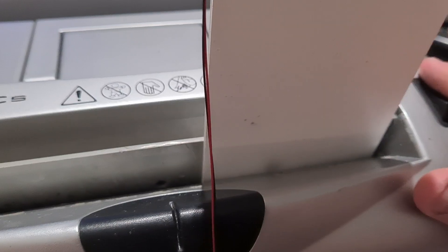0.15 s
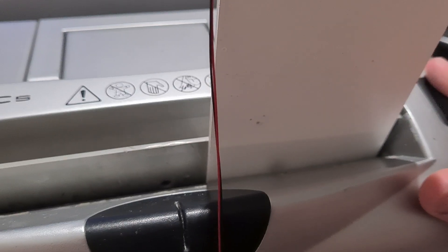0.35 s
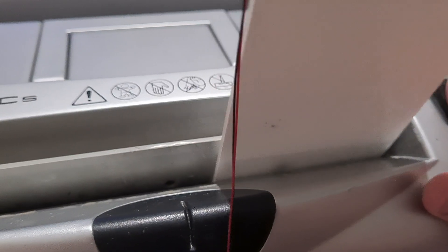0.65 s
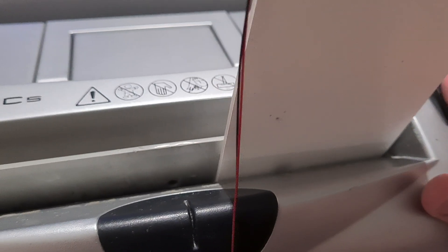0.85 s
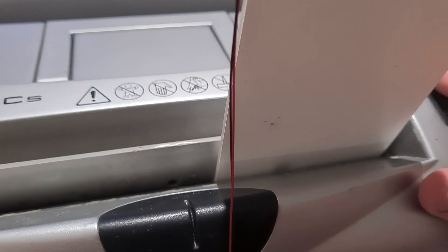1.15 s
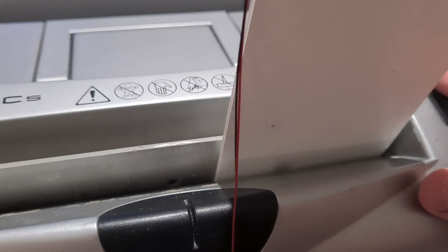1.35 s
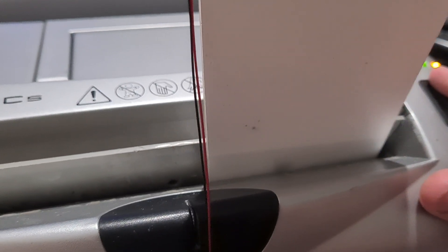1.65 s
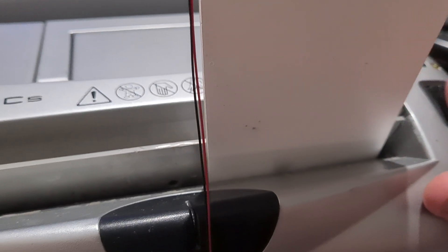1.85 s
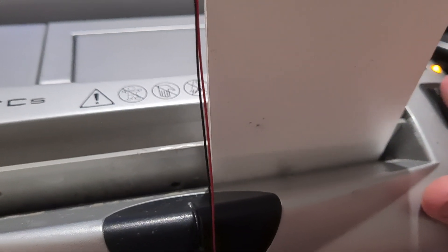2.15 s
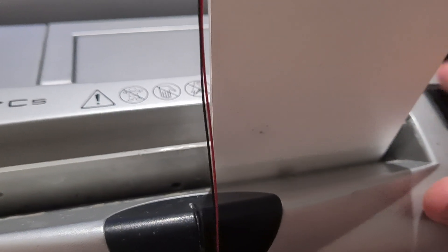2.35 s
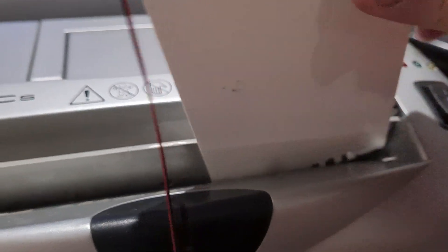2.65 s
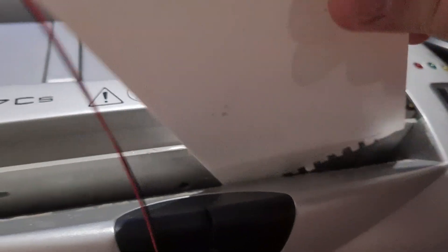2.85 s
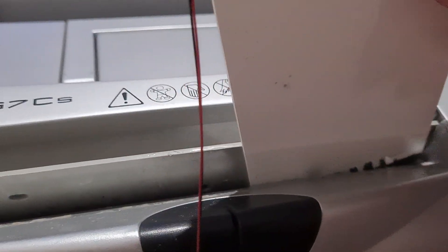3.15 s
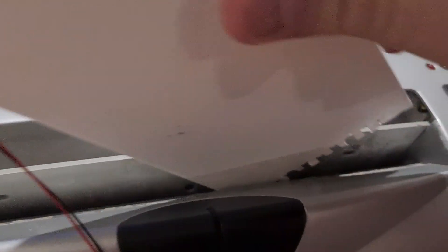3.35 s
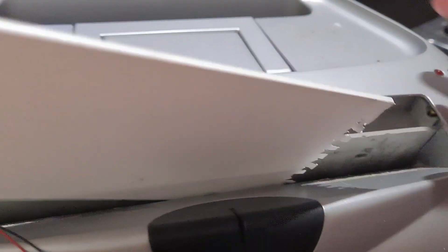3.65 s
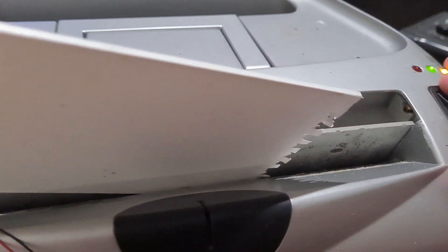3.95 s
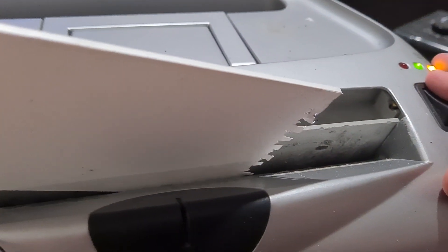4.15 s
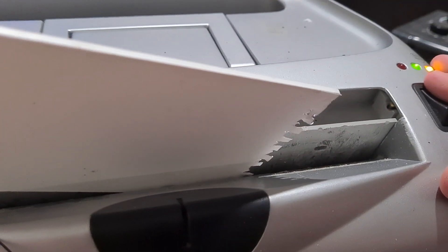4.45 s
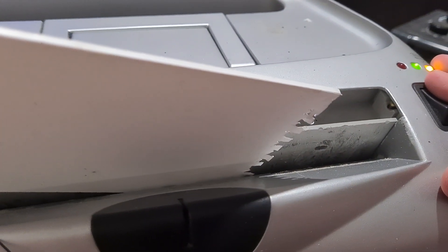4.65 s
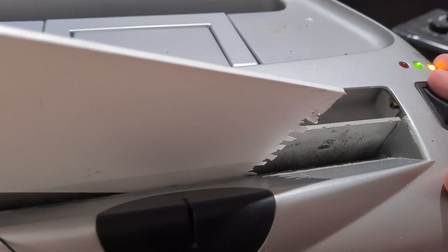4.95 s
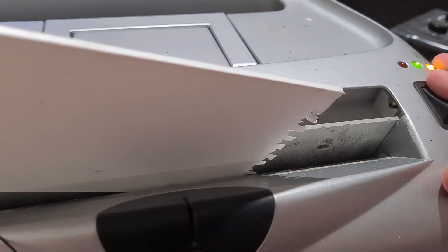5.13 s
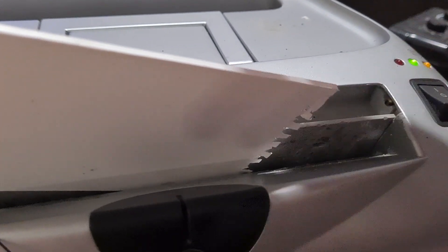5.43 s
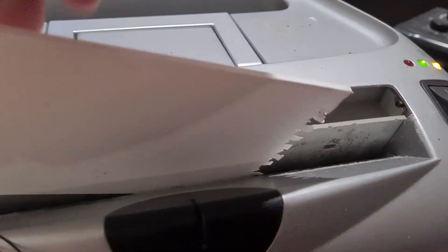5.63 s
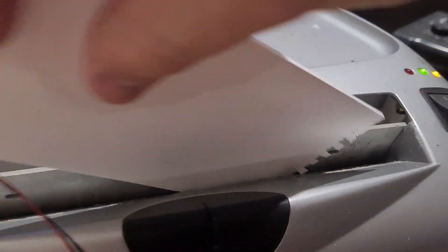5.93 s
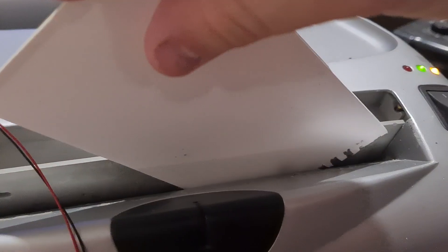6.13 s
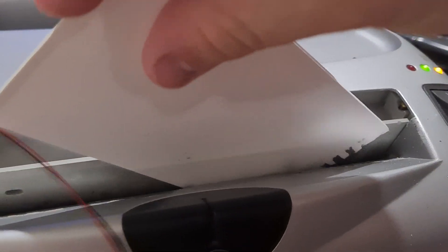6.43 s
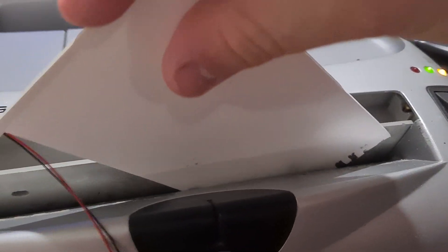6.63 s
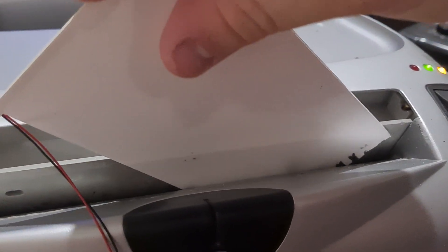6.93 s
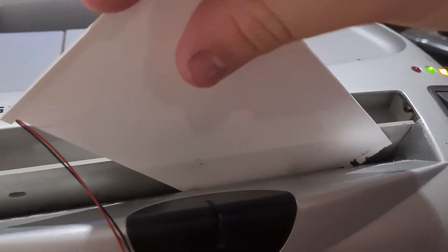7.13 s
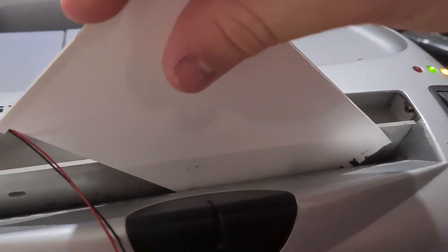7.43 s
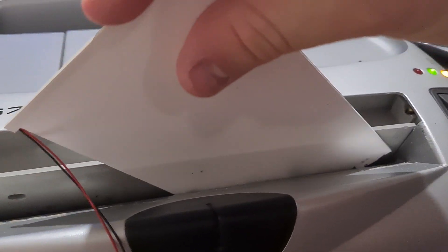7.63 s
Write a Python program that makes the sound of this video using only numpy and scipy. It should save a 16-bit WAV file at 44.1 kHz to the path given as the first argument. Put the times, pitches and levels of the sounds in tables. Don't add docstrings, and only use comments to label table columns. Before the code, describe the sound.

A small electric shredder hums in short spurts with sharp switch clicks, then bites stiff plastic with loud cracks, knocks and a crunching chatter.

```python
import sys
import numpy as np
from scipy import signal
from scipy.fft import rfft, irfft, next_fast_len
from scipy.io import wavfile
from scipy.ndimage import map_coordinates

SR = 44100
rng = np.random.default_rng(int(sys.argv[2]) if len(sys.argv) > 2 else 0)


def how_loud(loudness_db):
    steps = np.asarray(loudness_db, float) / 20
    return 10 ** steps


def output_pcm(signal):
    pcm = np.clip(np.atleast_2d(signal).T, -1, 1) * 32767
    wavfile.write(sys.argv[1], SR, np.round(pcm).astype(np.int16))


N = 343098

# on in seconds, off in seconds, gear whir level in dB.
SWITCH_RUNS = [
    (-.1, 0.18, -56.5),
    (0.519, 1.04, -52.5),
    (1.134, 1.45, -49),
    (1.947, 2.178, -51),
    (3.6, 3.596, -65),
    (3.982, 8, -46.5),
]
# start in seconds, peak in dB, panel level in dB relative to it, t60 in seconds.
BIN_JOLTS = [(0.037, -39.5, -11, 0.4), (0.437, -46.5, 2.5, 0.5), (1.313, -32, 1.5, 0.31),
             (1.449, -26.5, -6, 0.24), (1.499, -33, 0, 0.38), (1.632, -41.5, 0, 0.28),
             (1.868, -44, -2, 0.58), (2.58, -41.5, 4.5, 0.25), (2.64, -50.5, 2, 0.21),
             (2.979, -37.5, -1, 0.22), (3.9, -39.5, -22, 0.23), (4.207, -15, 1, 0.3),
             (4.246, -27.5, 5, 0.83), (4.364, -19, -2, 0.33), (4.746, -19, 3, 0.29),
             (4.888, -30, 11.5, 0.27), (6.347, -22, 0.5, 0.39), (6.481, -18, -27, 0.16),
             (6.599, -19, -19, 0.23), (6.709, -18, -7.5, 0.15), (6.772, -14.5, -5, 0.16),
             (6.9, -24, 2.5, 0.26), (6.969, -30.5, 11, 0.38), (7.279, -26.5, 4, 0.34),
             (7.419, -28.5, -4, 0.35), (7.648, -24, 0.5, 0.19), (7.708, -28.5, 8.5, 0.19)]
# start in seconds, peak in dB, knock and top in dB relative to it.
FIRST_MOUTHFUL = [(6.2863, -16.5, -15, -9), (6.2922, -16, -6.5, -5), (6.33, -12, -8.5, -3.5),
                  (6.3485, -20.5, 10, -11), (6.373, -13, -1.5, -3), (6.4438, -23, -7, 4.5),
                  (6.4516, -17.5, -9.5, 6), (6.497, -16, 2.5, -6), (6.547, -14, -26, -9),
                  (6.5757, -8, -15.5, -2), (6.6491, -15, -24, -7), (6.6602, -11.5, -17, -2.5),
                  (6.6786, -12, -12.5, -1), (6.6925, -20.5, -2.5, -13), (6.7059, -10.5, -8.5, -5.5),
                  (6.7578, -10, -1, 0), (6.8145, -9.5, -30, -2), (6.8235, -15, -22, -9),
                  (6.8441, -7, -7, -6), (6.8776, -7.5, -3, -6), (6.951, -7, -13, -5),
                  (6.9759, -17.5, -6, -12), (7.0074, -26, -11, 0), (7.0355, -20.5, -33, 2),
                  (7.0604, -11, -16, -4), (7.088, -28, -29, 3), (7.1173, -22.5, -6.5, -0.5),
                  (7.1934, -17.5, -18, -15)]


def unit(x):
    return x / np.sqrt(np.mean(x ** 2) + 1e-20)


def along(points, hz):
    f, value = np.transpose(points)
    return np.interp(np.log(hz + 1), np.log(f + 1), value)


def curves(rows):
    s, *columns = np.transpose(rows)
    return [np.interp(np.arange(N) / SR, s, column) for column in columns]


def wobble(rate):
    knots = rng.standard_normal(int(N * rate / SR) + 4)
    return map_coordinates(knots, [np.arange(N) * rate / SR])


def filtered(x, response):
    m = next_fast_len(N + SR // 2)
    return irfft(rfft(x, m) * response(np.fft.rfftfreq(m, 1 / SR)), m)[..., :N]


def band(x, lo_hz, hi_hz):
    return signal.lfilter(*signal.butter(2, [lo_hz, hi_hz], "band", fs=SR), x)


def hiss(spectrum):
    return unit(filtered(rng.standard_normal((2, N)), lambda hz: how_loud(along(spectrum, hz))))


def tone(hz, drift):
    return np.sqrt(2) * np.sin(2 * np.pi * np.cumsum(hz * (1 + drift * wobble(13))) / SR)


def powered(rise, fall):
    t = np.arange(N) / SR
    return [np.minimum(0, np.minimum(rise * (t - on), fall * (off - t))) for on, off, _ in SWITCH_RUNS]


def effort():
    # time in seconds, hum level in dB.
    pull = [(0.05, -30), (0.22, -46), (0.56, -26.5), (0.65, -39), (0.8, -25.5), (0.88, -42), (1.14, -29.5),
            (1.35, -30), (1.45, -28), (2.16, -31.5), (3.59, -27.5), (3.99, -24.5), (4.08, -28.5),
            (4.2, -27.5), (5.6, -23), (6.3, -24), (7.05, -31.5), (7.62, -33.5)]
    hum_rest_db, gear_rest_db = -66, -70
    strain_db, strain_s = -29, 0.036
    hum = how_loud(curves(pull)[0] + np.max(powered(570, 460), axis=0)) + how_loud(hum_rest_db)
    ramps = powered(300, 440)
    whir = sum(how_loud(db + ramp) for (_, _, db), ramp in zip(SWITCH_RUNS, ramps)) + how_loud(gear_rest_db)
    starts = [round(row[0] * SR) for row in BIN_JOLTS]
    jolts = np.bincount(starts, [how_loud(row[1] + strain_db) for row in BIN_JOLTS], N)
    ease = np.arange(SR // 2) / SR / strain_s
    strain = signal.fftconvolve(jolts, ease * np.exp(1 - ease))[:N]
    return hum, whir + np.abs(strain)


def motor():
    # frequency in Hz, width in Hz, level in dB.
    gear_modes = [(148, 49, 1), (203, 41, 1), (295.4, 13.6, 3.5), (378.4, 31.5, -4.5), (448.6, 11, -2),
                  (589, 40, -2), (820, 90, -8.5), (1160, 36, -5.5), (1349, 54, -4.5), (1960, 230, -12.5),
                  (3000, 440, -20.5)]
    # frequency in Hz, level in dB per Hz.
    whir_spectrum = [(60, -18), (130, -9.5), (230, -28), (640, -35.5), (1500, -65), (4000, -45.5),
                     (12000, -61), (17000, -85)]
    # multiple of the shaft rate, level in dB relative to the hum.
    shaft_orders = [(3, -39.5), (9, -19), (12, -24.5), (15, -24.5), (16, -26)]
    # time in seconds, level in dB.
    free_run = [
        (4.7, -18),
        (5.1, -2.5),
        (6.2, -1.5),
        (6.4, -19),
    ]
    hum_hz, shaft_hz = 100, 49
    hum_gain, whir_gain = effort()
    hum = how_loud(wobble(8)) * tone(hum_hz, 0)
    hum += how_loud(-24.5) * tone(2 * hum_hz, 0) + how_loud(-25.5) * tone(3 * hum_hz, 0)
    turns = np.cumsum(shaft_hz * (1 + .004 * wobble(6))) / SR
    orders = sum(how_loud(db + 3 * wobble(24)) * np.sin(2 * np.pi * k * turns) for k, db in shaft_orders)
    buzz = hum + how_loud(curves(free_run)[0]) * orders
    teeth = rng.standard_normal((2, N)) * how_loud(3.5 * wobble(160) + 1.6 * wobble(22))

    def resonate(f):
        return sum((-1) ** k * how_loud(db) * 1j * f * width / (centre * centre - f * f + 1j * f * width)
                   for k, (centre, width, db) in enumerate(gear_modes))

    broad = filtered(teeth[::-1], lambda hz: how_loud(along(whir_spectrum, hz)))
    whir = unit(filtered(teeth, resonate)) + how_loud(1.5) * unit(broad)
    return how_loud(7.0) * whir_gain * whir + hum_gain * np.array([buzz, np.roll(buzz, 90)])


def breaks():
    # start in seconds, peak in dB, knock and top in dB relative to it.
    second_mouthful = [(7.2615, -6, -18.5, -4), (7.2814, -8.5, -11, -3), (7.3379, -7.5, -26, -12.5),
                       (7.3437, -7.5, -18, -2), (7.3617, -19, -47, -2), (7.3733, -21.5, -3.5, 6.5),
                       (7.4026, -11.5, -7, -2.5), (7.5122, -10, -4, -8.5), (7.5689, -22, -13, 0),
                       (7.5853, -10, -15.5, -3), (7.613, -8, -20.5, -6), (7.645, -9.5, -5, 1),
                       (7.6905, -7, -9, -8), (7.737, -12.5, -11, -8.5)]
    # start in seconds, peak in dB, top in dB relative to it, ring in Hz.
    switch_clicks = [(0.2228, -49.5, 5, 7500), (0.4086, -21.5, -18, 5000), (0.4331, -17, -10, 5030),
                     (0.468, -8, -4.5, 6930), (0.633, -32.5, -12, 4320), (0.6623, -25.5, -18, 3100),
                     (0.7053, -26.5, -11.5, 3540), (1.032, -15, -9, 6120), (1.4015, -29, -11, 2550),
                     (1.8411, -18, -18, 5240), (1.8703, -15.5, -8.5, 5630), (2.1248, -30, -7, 4570),
                     (2.143, -15, -15, 4820), (2.8141, -31, -7, 3380), (2.957, -44.5, -30, 5630),
                     (3.177, -42, -1.5, 3030), (3.325, -37.5, -16, 4370), (3.362, -40, -9, 4450),
                     (3.88, -33, -44, 5830), (4.1953, -10.5, -27, 3350), (5.111, -23.5, -10, 5520),
                     (5.392, -34.5, -13, 5040), (5.7175, -28, -13, 7600), (5.9677, -19, -7.5, 4900),
                     (6.0728, -25, -3, 3520)]
    # start
    # in seconds, peak in dB, knock and clack in dB relative to it, ring in Hz.
    cutter_blows = [(0.0365, -37.5, 0.5, 2, 3240), (0.0783, -32.5, -17, -11, 6900),
                    (0.133, -34.5, -7.5, -9, 4230), (0.7348, -46.5, 14, 10.5, 2564),
                    (0.8704, -15, -31.5, -10.5, 5000), (1.271, -28, -3, -0.5, 3100),
                    (1.294, -24.5, 6, 3.5, 3180), (1.4203, -21, -22.5, 0, 4000),
                    (1.4356, -17, -6, -4, 4000), (1.4677, -26.5, -1, -17, 4380),
                    (1.489, -18, -9.5, -6.5, 5100), (1.6169, -14, -5.5, 2.5, 2800),
                    (3.8865, -10, -44, -12, 6200), (4.1727, -26, 4.5, 7, 3120),
                    (4.1967, -3.5, -12.5, -3, 3120), (4.2392, -7.5, -7, -2, 2900),
                    (4.344, -7, -4, -3.5, 2640), (4.468, -25, 0, 4, 3230), (4.544, -29, 0.5, -0.5, 2970),
                    (4.6883, -16, -8, -5.5, 2950), (4.732, -2.5, -13, -7, 2710),
                    (4.871, -6, -11.5, -10, 6840), (5.3673, -43.5, -23, 11, 2700),
                    (5.5104, -34, -19, 3.5, 2640)]
    # start in seconds, peak in dB, knock and clack in dB relative to it, ring in Hz.
    hand_moves = [(2.5674, -27.5, -8.5, 11, 2680), (2.6293, -24.5, -2, -4, 5820),
                  (2.7663, -45.5, 3, 0.5, 3200), (2.8621, -43.5, -2, -4, 3450),
                  (2.971, -22.5, -15, -1.5, 3870), (2.9941, -7, -8.5, -8, 2930),
                  (3.0969, -17.5, -31, -9, 4450), (3.236, -47.5, 5, 7, 3100), (3.2933, -46, -16, -6, 4610),
                  (3.4488, -51, -8, -1, 3130), (3.5005, -42.5, -4, 2.5, 4280), (3.5568, -28, -13, -3, 3100),
                  (3.6681, -44, -3.5, -3, 4250)]
    chew = FIRST_MOUTHFUL + second_mouthful
    rings = 2800 * 2 ** (1.4 * rng.uniform(size=len(chew)) ** 2)
    events = [(s, db, top, -3 + 0.53 * knock, knock, hz) for (s, db, knock, top), hz in zip(chew, rings)]
    events += [(s, db, top, -17, -32.5, hz) for s, db, top, hz in switch_clicks]
    for rows, top_db in ((cutter_blows, -8), (hand_moves, -11)):
        events += [(s, db, top_db + 0.068 * db, clack, knock, hz) for s, db, knock, clack, hz in rows]
    return events


def snaps(events):
    # frequency in Hz, level in dB, t60 in seconds.
    casing_modes = [(307, 1.5, 0.085), (316, -1, 0.1), (371.8, 6.5, 0.082), (410, -4, 0.18),
                    (577, -1, 0.08), (691, -6.5, 0.13), (801.5, -2.5, 0.1)]
    chew_ring_db = -3
    size, early = SR // 6, SR // 100
    t = np.arange(-early, size - early) / SR
    after = np.maximum(t, 0)
    broken = t >= 0
    out, notes = np.zeros((2, 2, N + size))
    hz, level, t60 = np.transpose(casing_modes)[..., None]
    for s, db, top_db, clack_db, knock_db, ring_hz in events:
        late = rng.uniform(0, 0.0035, (3, 1))
        micro = how_loud(-4 - 700 * late - 60 * np.maximum(t - late, 0) / 0.004) * (t >= late)
        cluster = broken * how_loud(2 - 60 * after / 0.007) + micro.sum(axis=0)
        creak = how_loud(np.where(t < 0, -17 + 1800 * t, -13 - 60 * t / 0.013))
        crack = rng.standard_normal((2, size)) * (cluster + creak)
        crack[0, early:early + 3] += how_loud(-2.5) * np.array([1, -1, .5])
        note = signal.lfilter(*signal.iirpeak(ring_hz, 10, fs=SR), crack)
        note /= np.abs(note).max()
        bright = band(crack, 2050, 7750) + how_loud(top_db + 3.5) * band(crack, 6030, 14600)
        rattle = broken * how_loud(-2.0 - 60 * after / 0.067) * rng.standard_normal((2, size))
        clack = how_loud(clack_db + 7.5) * band(crack + rattle, 703, 2546)
        luck = rng.standard_normal((3, 2, len(casing_modes), 1))
        swing = np.sin(2 * np.pi * hz * (1 + 0.032 * luck[1]) * after + 1.05 * luck[2])
        ring = how_loud(level + 4.42 * luck[0] - 60 * after / t60) * swing
        knock = how_loud(knock_db - 6.0) * ring.sum(axis=1) * (1 - np.exp(-after / 0.0018))
        note_db = -7 + 0.91 * db + chew_ring_db * (s >= FIRST_MOUTHFUL[0][0])
        first = round(s * SR) - early
        out[:, first:][:, :size] += how_loud(db) * (bright + clack + knock)
        notes[:, first:][:, :size] += how_loud(note_db) * note
    return out[:, :N], notes[:, :N]


def thuds():
    bin_hz = 70
    size = SR // 2
    t = np.arange(size) / SR
    out = np.zeros(N + size)
    for s, db, panel_db, t60 in BIN_JOLTS:
        luck = rng.standard_normal(4)
        sagging = t + 0.0033 * (1 - np.exp(-t / 0.06))
        rock = np.sin(2 * np.pi * bin_hz * (1 + luck[0] / 30) * sagging) * (1 - np.exp(-t / 0.015))
        panels = np.sin(2 * np.pi * 158 * (1 + 0.08 * luck[1]) * t)
        panels += 0.57 * np.sin(2 * np.pi * 200 * (1 + 0.071 * luck[2]) * t)
        panels += 1.1 * unit(band(rng.standard_normal(size), 79, 273))
        flap = how_loud(panel_db - 9.5 - 60 * t / 0.2) * panels * (1 - np.exp(-t / 0.0043))
        out[round(s * SR):][:size] += how_loud(db + 12.5) * (rock * how_loud(-60 * t / t60) + flap)
    return out[:N]


def pings():
    # start in seconds, peak in dB, frequency in Hz.
    clear_notes = [
        (0.409, -31, 3100),
        (0.468, -17, 3550),
        (1.0325, -24.5, 2920),
        (1.617, -14, 2040),
        (2.569, -25, 1900),
        (3.2935, -52, 4610),
        (3.326, -45, 4400),
        (3.557, -19, 3070),
        (3.881, -31, 5960),
        (4.873, -16, 6350),
    ]
    t = np.arange(SR // 16) / SR
    out = np.zeros(N)
    for s, db, hz in clear_notes:
        pair = np.sin(2 * np.pi * hz * t) + .4 * np.sin(2 * np.pi * 0.65 * hz * t)
        out[round(s * SR):][:len(t)] += how_loud(db - 60 * t / .022) * (1 - np.exp(-t / .0006)) * pair
    return out


def drag():
    # time in seconds, level in dB.
    push = [(0, -92), (2.7, -81), (3.3, -61.5), (3.8, -82), (5.0, -68), (5.8, -66), (6.15, -52), (6.3, -48),
            (6.42, -42), (6.9, -32.5), (7.03, -46), (7.16, -62), (7.4, -48), (7.5, -56), (7.78, -52)]
    # start in seconds, length in seconds, level in dB.
    sudden_slides = [(0.475, 0.13, -49.5), (0.856, .05, -44), (1.471, 0.11, -50.5), (2.591, 0.053, -46),
                     (2.878, 0.016, -69), (3.503, 0.033, -51), (3.667, 0.016, -64), (5.902, .06, -50),
                     (6.2, .05, -54), (6.435, 0.071, -29), (6.572, 0.057, -31), (6.654, 0.053, -41),
                     (6.816, 0.046, -40.5), (6.955, .05, -35.5), (7.268, .06, -29), (7.341, 0.033, -31),
                     (7.583, 0.026, -20.5), (7.622, .025, -29.5)]
    # frequency in Hz, level in dB per Hz.
    scrape_spectrum = [(700, -30), (1300, -10), (2500, -5), (5000, -2), (8000, -2), (12000, -1),
                       (16000, -4)]
    echo_s, echo_gain = .00048, .4
    t = np.arange(N) / SR
    slides = 0
    for s, length, db in sudden_slides:
        fade = np.minimum((t - s) / 0.0057, 1 + (s + length - t) / 0.017)
        slides = slides + how_loud(db) * np.clip(fade, 0, 1)
    grit = unit(how_loud(4.1 * wobble(450) + 3.4 * wobble(60) + 4.8 * wobble(5.024)))
    rasp = (how_loud(curves(push)[0]) * grit + slides * how_loud(2.9 * wobble(150))) * hiss(scrape_spectrum)
    return 0.83 * (rasp + echo_gain * np.roll(rasp, round(echo_s * SR), axis=1))


def small_breaks():
    # start in
    # seconds, peak in dB, top in dB relative to it, ring in Hz.
    splinters = [(5.9344, -29, -7, 2320), (6.2044, -38, 4.5, 8090), (6.235, -42, 1, 8000),
                 (6.304, -28, -6, 5500), (6.368, -24, 3, 7000), (6.433, -31, -10, 2500),
                 (6.506, -23.5, 1.5, 8000), (6.656, -24, 0, 8000), (6.84, -18, -3, 8000),
                 (6.968, -29, -4, 8000), (6.991, -22, -11, 7500), (7.128, -37, 5, 8000),
                 (7.142, -45, -3, 8000), (7.2303, -35, 0, 4000), (7.349, -14, 1, 6460),
                 (7.355, -16.5, 6, 4500), (7.365, -14, 1, 7000), (7.458, -33, -4, 3500),
                 (7.523, -17.5, -5, 3500), (7.729, -33, 0, 4970), (2.582, -32, -10, 4520),
                 (2.655, -39, -13, 5900), (2.9813, -18, -5, 2050), (3.115, -38, -4, 3500),
                 (3.28, -54.5, -5, 6500), (3.79, -63, -2, 6930), (3.856, -58.5, -1.5, 3270)]
    # start in seconds, peak in dB, knock in dB relative to it, ring in Hz.
    dull_taps = [(1.22, -42, 4, 1800), (1.46, -32, -2, 2050), (2.8784, -49, 2.5, 3250),
                 (5.081, -41.5, -15, 2730), (5.1824, -50, -15, 2730), (5.2231, -39.5, -15, 2150),
                 (5.3048, -53, -15, 2870), (5.4477, -50, -18, 2720), (5.6323, -40, -15, 2080),
                 (5.665, -39, -11, 2710), (5.7534, -46, -15, 2130), (5.813, -47, -12, 2800),
                 (5.8557, -56, -15, 3150), (5.8946, -39.5, -15, 3130), (6.036, -41, -15, 3400),
                 (6.0983, -41, -15, 2080), (6.128, -44, -15, 2010)]
    return ([(s, db, top, -17, -32.5, hz) for s, db, top, hz in splinters]
            + [(s, db, -14.5, 4.5, knock, hz) for s, db, knock, hz in dull_taps])


def room(x):
    # frequency in Hz, t60 in seconds.
    decay = [(100, 0.1), (1000, 0.16), (4000, 0.23), (12000, 0.19)]
    size = SR // 4
    out = np.zeros((2, N + 2 * SR))
    for start in range(0, N, size):
        hz, t, z = signal.stft(rng.standard_normal((2, SR // 3)), SR, nperseg=256)
        fading = z * how_loud(-60 * t / along(decay, hz)[:, None])
        tail = signal.istft(fading, SR, nperseg=256)[1]
        wet = signal.fftconvolve(x[:, start:start + size], tail / np.linalg.norm(tail[0]), axes=1)
        out[:, start + 200:][:, :wet.shape[1]] += wet
    return signal.sosfilt(signal.butter(2, 350, "high", fs=SR, output="sos"), out[:, :N])


def ports(pair):
    # frequency in Hz, left-right correlation from 0 to 1.
    likeness = [(30, .93), (70, .97), (120, .99), (300, .96), (700, .85), (1500, .55), (12000, .35)]
    # frequency in Hz, lead of the left port in radians.
    left_lead = [(0, .08), (780, 0.81), (1720, 2.5), (3190, 0.9), (6720, -9), (10900, -3), (15200, 11)]
    # frequency in Hz, left over right in dB.
    balance = [(100, -0.5), (380, -1), (700, 1.5), (1290, -3.5), (3000, 2.5), (6000, 6.5), (15000, -1.5)]

    def mid_side(hz):
        turn = np.arccos(np.clip(along(likeness, hz), 0, 1)) / 2
        return np.array([np.cos(turn), np.sin(turn)])

    def apart(hz):
        f, lead = np.transpose(left_lead)
        gain = how_loud(np.outer([.5, -.5], along(balance, hz)))
        return gain * np.exp(np.outer([.5j, -.5j], np.interp(hz, f, lead)))

    mid, side = filtered(pair, mid_side)
    return filtered(np.array([mid + side, mid - side]), apart)


def scene():
    # frequency in Hz, level in dB per Hz.
    quiet_spectrum = [(25, -24), (65, 7), (113, -5), (270, -11.5), (600, -14), (1800, -19.5),
                      (12000, -40.5), (17000, -79.5)]
    hits, notes = snaps(breaks())
    jolts = thuds()
    steady = motor() + np.array([jolts, np.roll(jolts, 130)]) + drag() + how_loud(-65.5) * hiss(quiet_spectrum)
    small, small_notes = snaps(small_breaks())
    rings = notes + small_notes + pings()
    tail = how_loud(-7.5) * room(hits + small + how_loud(-6) * rings)
    return tail + ports(hits + small + rings + steady)


def low_pass(x):
    return signal.sosfilt(signal.butter(12, 17150, fs=SR, output="sos"), x)


def record(dry):
    soft = dry / (1 + np.abs(dry) ** 8) ** (1 / 8)

    def limits(hz):
        treble_db = -34 * np.clip((hz - 15850) / 250, 0, 1) - 60 * (hz > 17100)
        return how_loud(treble_db) / (1 + (42 / (hz + 1)) ** 2)

    return low_pass(filtered(soft, limits))


dry = scene()
out = record(dry)
output_pcm(out)
```